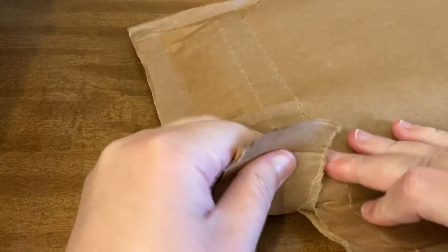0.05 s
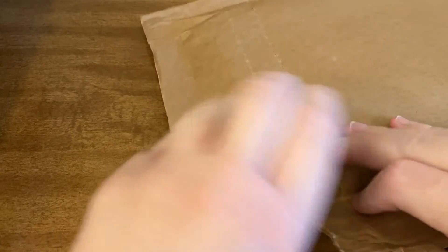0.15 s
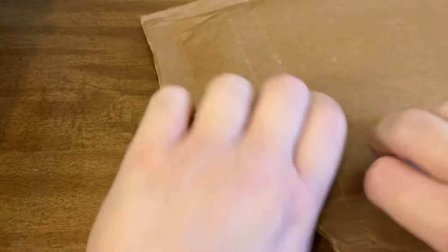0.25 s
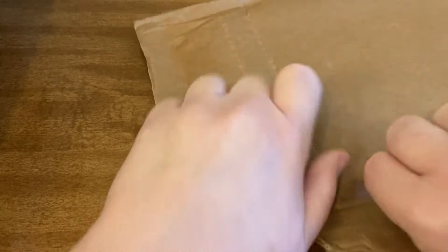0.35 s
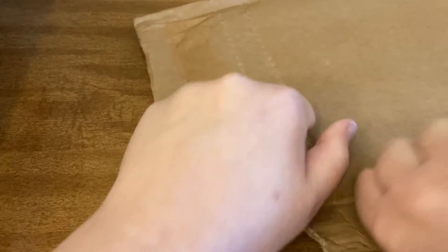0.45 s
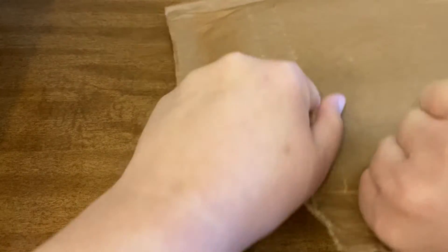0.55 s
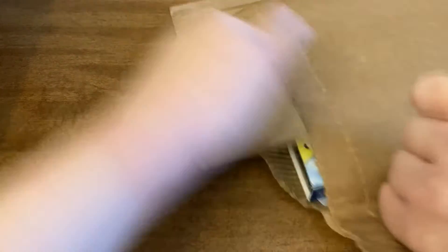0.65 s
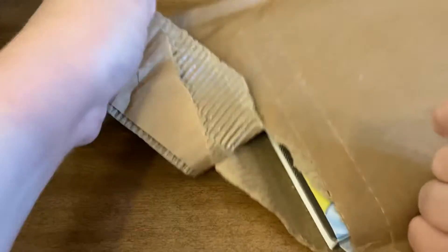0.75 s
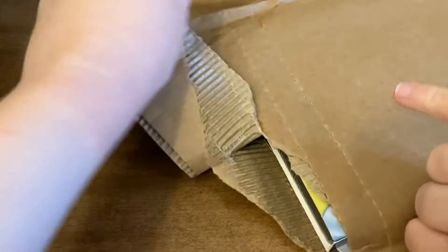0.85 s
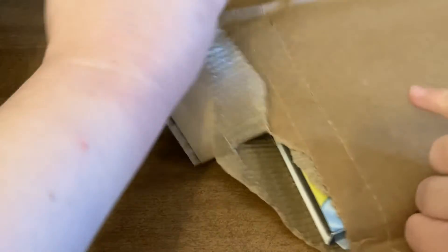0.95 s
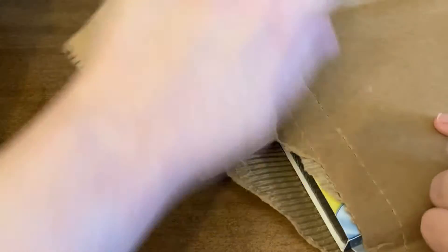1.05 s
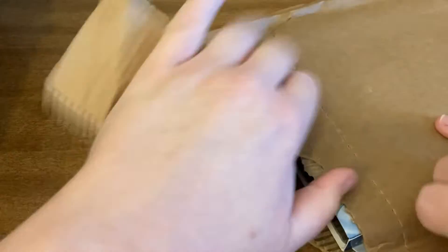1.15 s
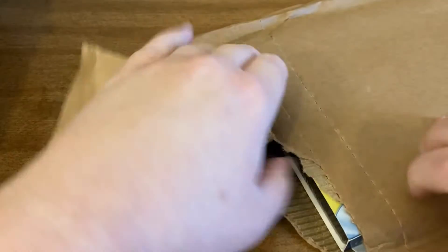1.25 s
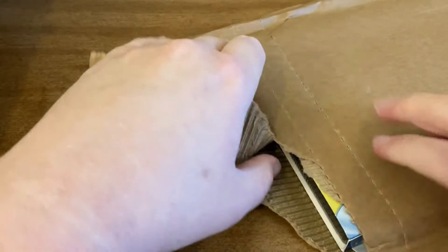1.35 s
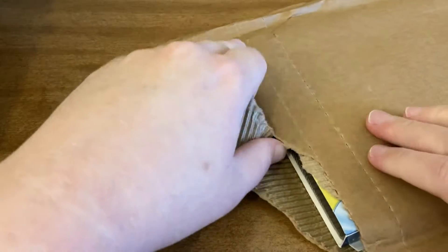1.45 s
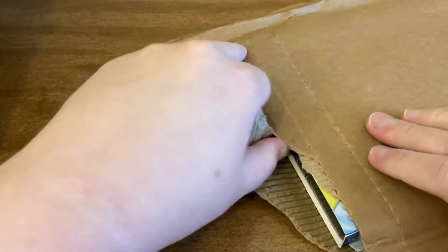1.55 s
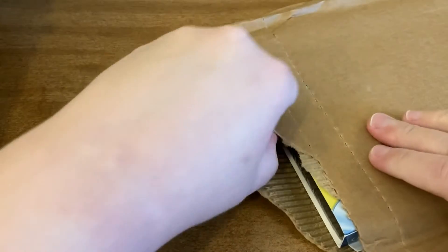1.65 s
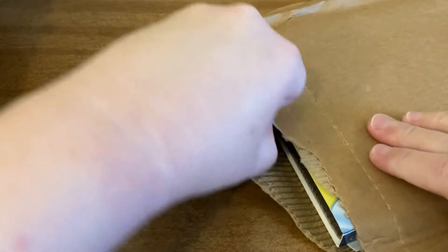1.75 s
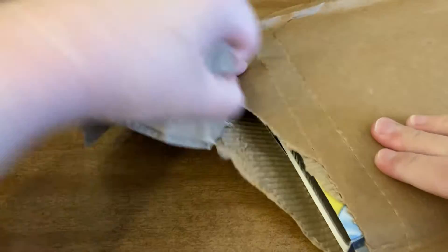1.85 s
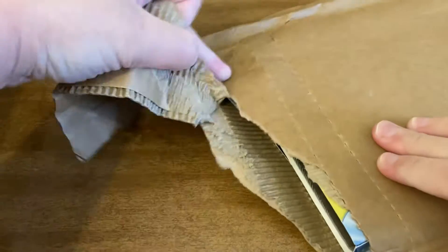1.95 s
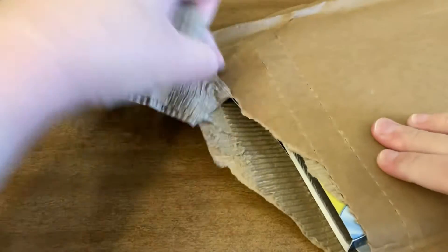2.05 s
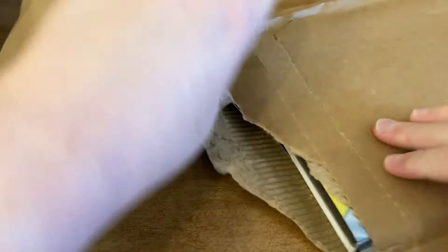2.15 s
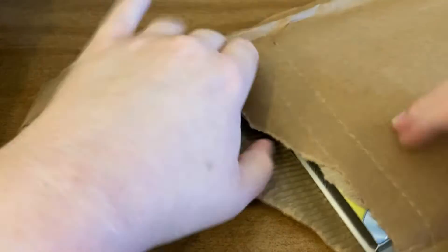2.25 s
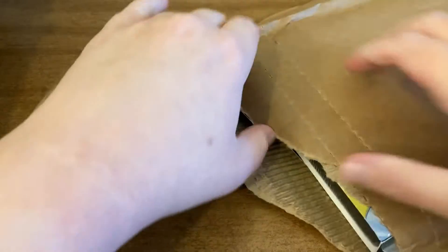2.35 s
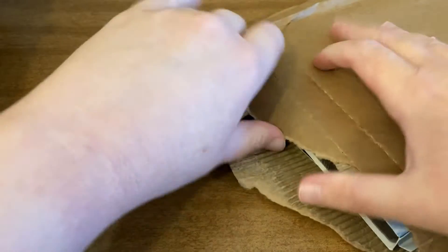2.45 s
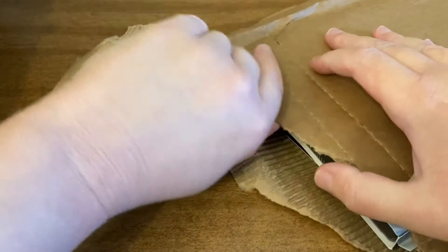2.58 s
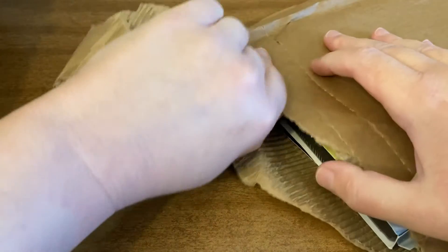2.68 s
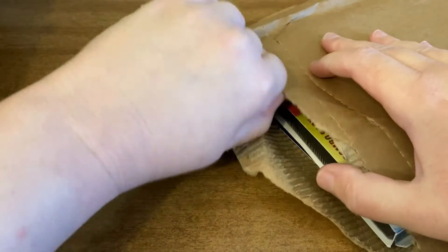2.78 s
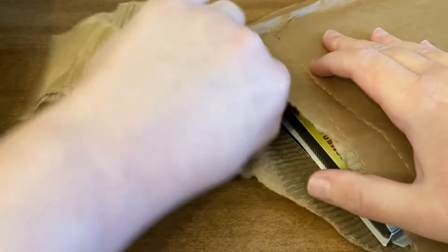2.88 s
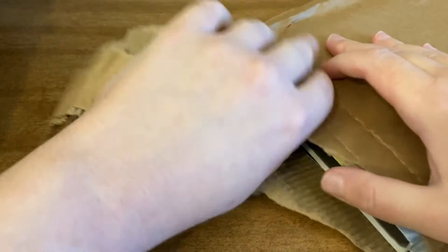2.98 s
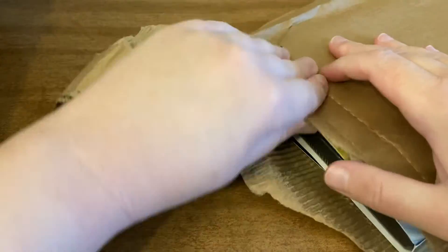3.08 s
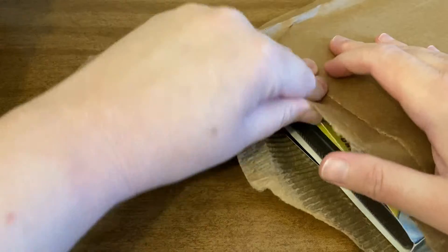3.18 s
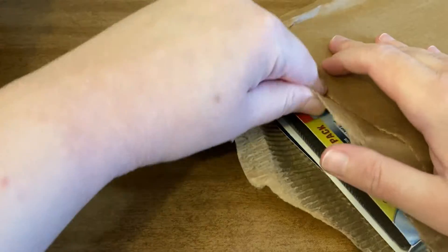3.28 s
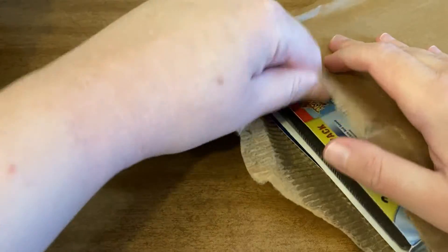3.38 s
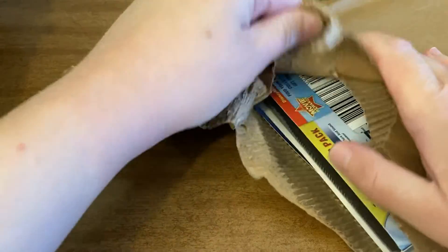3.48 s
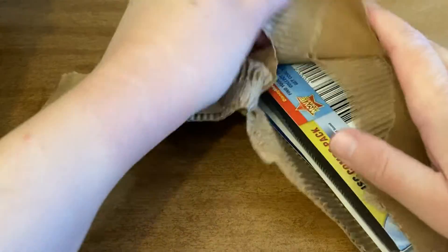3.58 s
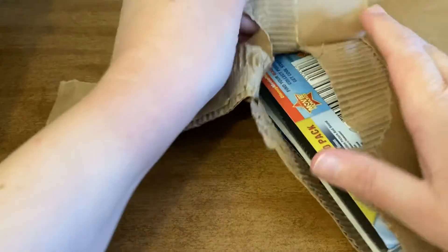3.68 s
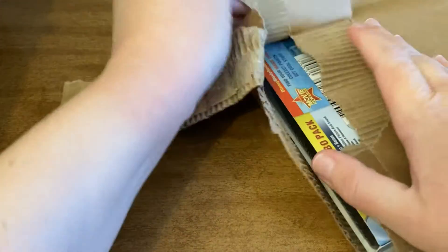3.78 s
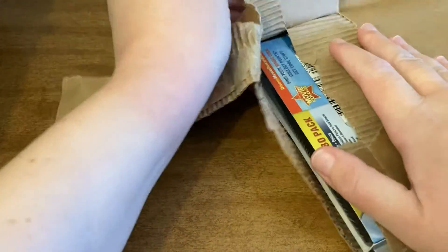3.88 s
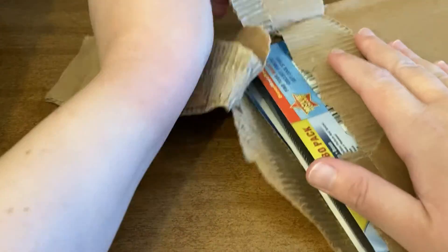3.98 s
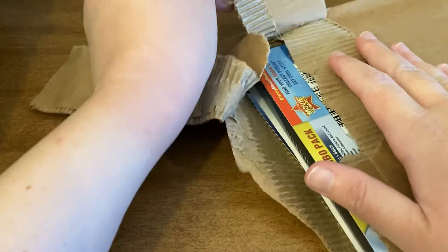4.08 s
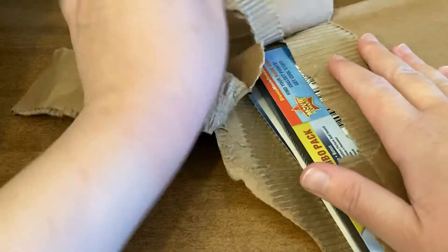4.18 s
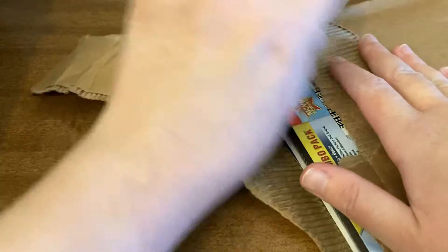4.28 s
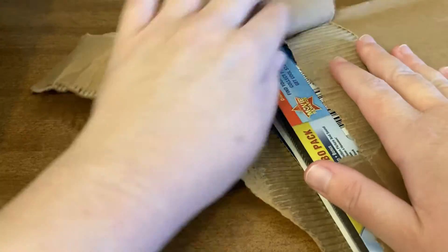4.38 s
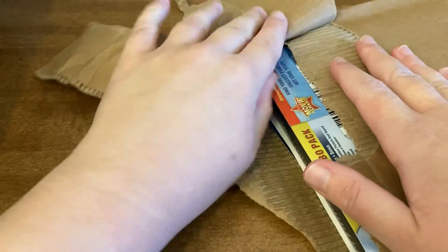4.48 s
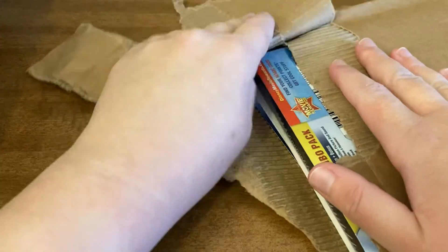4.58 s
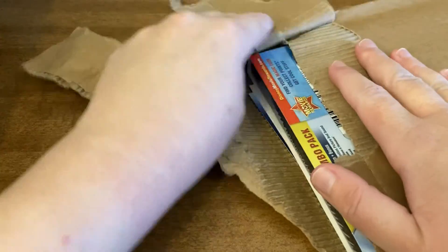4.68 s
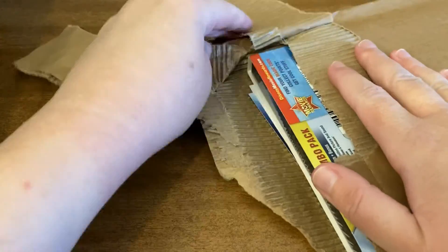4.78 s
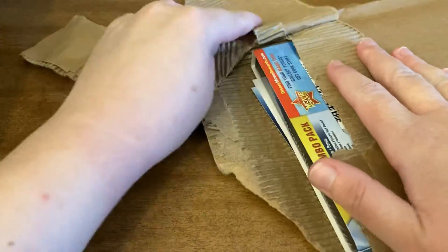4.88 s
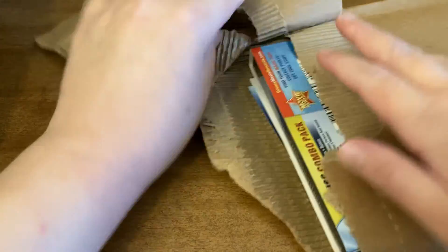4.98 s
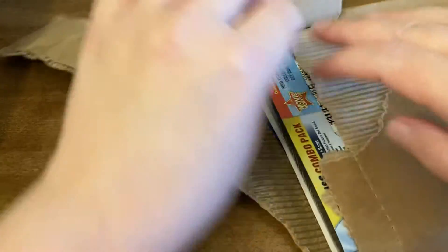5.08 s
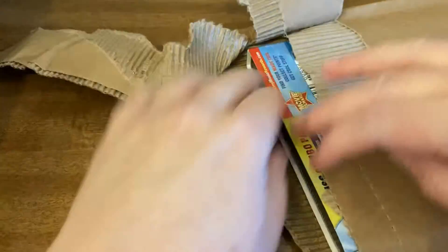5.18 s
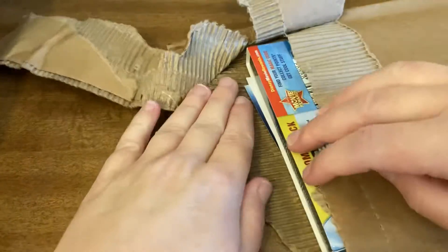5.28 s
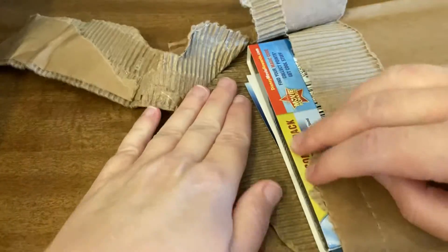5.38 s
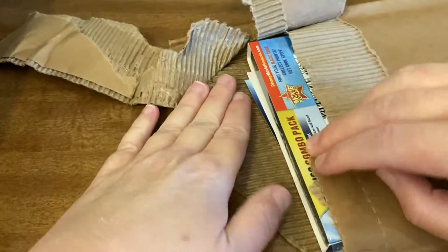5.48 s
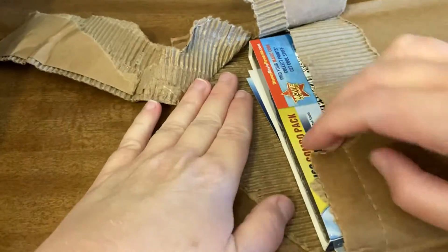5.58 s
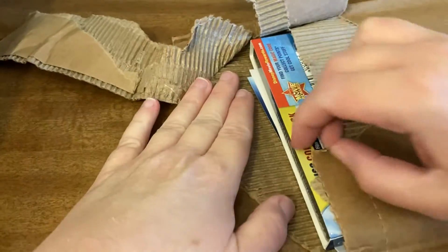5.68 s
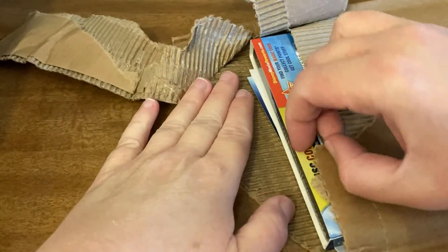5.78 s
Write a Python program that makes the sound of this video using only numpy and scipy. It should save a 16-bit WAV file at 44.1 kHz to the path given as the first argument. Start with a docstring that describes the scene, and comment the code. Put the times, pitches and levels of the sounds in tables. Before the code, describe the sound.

A cardboard mailer is pulled apart in irregular jerks. Bright, grainy fibre ticks burst into dense rips, while creases crack with short woody knocks and the panel booms softly underneath. Quiet finger handling separates the pulls. The heaviest cluster comes past the middle; the ending is sparse rustle. Close stereo microphone, wide scattered treble, centred bass, faint low room noise and a very short indoor tail.

```python
"""On a wooden table in a quiet room, hands tear a strip off a corrugated cardboard mailer.
Fibres part in dense clumps of ticks, made from random clicks through a bright filter.
Flutes and creases snap one by one: noise cracks over ringing card and a downward-sliding knock.
The card panel and the air inside the mailer boom as struck and shaken low resonances.
A close pair of microphone ports picks it up, over steady filtered-noise room tone and a short tail."""
import sys
import numpy as np
from scipy import signal
from scipy.fft import rfft, irfft
from scipy.io import wavfile

SR = 44100
rng = np.random.default_rng(int(sys.argv[2]) if len(sys.argv) > 2 else 0)


def wav_record(signal):
    """Record a signal, one row per channel, as 16-bit PCM in the file named by sys.argv[1]."""
    frames = np.transpose(np.atleast_2d(signal))
    bounded = np.clip(frames, -1, 1)
    # unit amplitude maps onto the largest positive 16-bit level
    quanta = np.round(bounded * 32767).astype(np.int16)
    wavfile.write(sys.argv[1], SR, quanta)


N = 257544


def from_db(db):
    """Decibels to amplitude; twice the decibels give power."""
    return 10 ** (np.asarray(db) / 20)


def rms_one(x):
    """Scale a signal to unit rms."""
    return x / np.sqrt(np.mean(x ** 2) + 1e-20)


def at_hz(points, hz):
    """Read a curve of (frequency, value) points along a logarithmic frequency axis."""
    point_hz, value = np.transpose(points)
    return np.interp(np.log(hz + 1), np.log(point_hz), value)


def coloured(x, spectrum):
    """Minimum-phase filter of unit energy with the given dB shape, so attacks stay sharp."""
    hz = np.linspace(0, SR / 2, 1025)
    squared_gain = from_db(2 * at_hz(spectrum, hz))   # minimum_phase takes the square root
    linear_phase = signal.firwin2(2047, hz, squared_gain, fs=SR)
    taps = signal.minimum_phase(linear_phase, n_fft=16384)
    return signal.oaconvolve(x, rms_one(taps) / np.sqrt(len(taps)))[:N]


def drift(rate_hz):
    """Random wander of unit rms: noise through two equal one-pole low-passes."""
    r = np.exp(-2 * np.pi * rate_hz / SR)
    noise = rng.standard_normal(N + 4000)
    return rms_one(signal.lfilter([1], [1, -2 * r, r * r], noise)[4000:])   # skip the run-in


def ring(clicks, hz, t60_s):
    """Two-pole resonator: a unit click starts a decaying sine of height 1."""
    r = from_db(-60 / (t60_s * SR))
    w = 2 * np.pi * hz / SR
    return signal.lfilter([0, np.sin(w)], [1, -2 * r * np.cos(w), r * r], clicks + 1e-18)


def ticks(per_s, spread_db):
    """Random clicks of either sign, their sizes spread upwards in dB."""
    draw = rng.uniform(-1, 1, N)
    size = rng.standard_exponential(N)
    out = np.zeros(N)
    born = np.abs(draw) < per_s / SR
    out[born] = np.sign(draw[born]) * from_db(spread_db * np.minimum(size[born], 5))
    return out


def shaken(modes, per_s, spread_db, clumps):
    """Each mode of a body is jolted by its own random clicks; the sum has unit rms."""
    total = 0
    for hz, db, t60_s in modes:
        jolts = clumps * ticks(per_s, spread_db)
        total = total + from_db(db) * ring(jolts, hz, t60_s)
    return rms_one(total)


def strike(modes, db, centre_hz, fall_db, rise_cycles, detune, size):
    """Modes near the centre pitch swing up most, low ones last; pitch and level vary a little at random."""
    t = np.arange(size)[:, None] / SR
    hz, mode_db, t60_s = np.transpose(modes)
    level_chance, pitch_chance = rng.standard_normal((2, len(modes)))
    near_db = -fall_db * np.log2(hz / centre_hz) ** 2
    decay = from_db(db + mode_db + near_db + 0.78 * level_chance - 60 * t / t60_s)
    rise = 1 - np.exp(-(t * hz / rise_cycles) ** 2)
    swing = np.sin(2 * np.pi * hz * (1 + detune * pitch_chance) * t)
    return np.sum(decay * rise * swing, axis=1)


# Spectrum of the quiet room: pitch_hz [Hz], density_db [dB per Hz, relative]
ROOM_TONE_SHAPE = [(18, -46), (30, 22.5), (177, -17), (315, 5), (399, -6.5), (830, -18), (2070, -31),
                   (4910, -31), (15500, -41.5)]
ROOM_TONE_DB = -56


def room_tone():
    """Steady noise with most of its weight in the bass."""
    return from_db(ROOM_TONE_DB) * rms_one(coloured(rng.standard_normal(N), ROOM_TONE_SHAPE))


# Resting fingers, a level curve: time_s [s], level_db [dB]
FINGER_TOUCH = [(0, -52), (.14, -63), (.5, -52.5), (1.2, -54), (1.6, -57), (2.6, -50), (3.2, -51.5),
                (4.4, -63.5), (4.65, -52), (5.3, -66), (5.84, -67.5)]
# Pulls and grips of the hands: full_strength_s [s], build_s [s], hold_s [s], fibre_db [dB],
# sag_db [dB lost over the hold], card_db [dB above the fibre ticks]
HAND_PULLS = [(0.188, 0.037, 0.052, -36.5, 4, -5.5), (0.318, 0.087, 0.24, -45, 7, 2.5),
              (0.624, 0.072, 0.068, -37.5, -3.5, -8.5), (0.704, 0.012, 0.034, -27, -7, -5),
              (0.749, 0.0059, 0.1, -13.5, 5.5, -3), (1.003, 0.063, 0.014, -39, 3, -24),
              (1.079, 0.1, 0.025, -34, 0, -8), (1.247, 0.1, 0.13, -42, -4, -2.5),
              (1.405, 0.053, 0.035, -38.5, -5.5, -6), (1.523, 0.0089, 0.027, -52, -1.5, 3.5),
              (1.631, 0.0037, 0.059, -37.5, 6, -7), (1.755, .02, 0.034, -39.5, -6, -13.5),
              (1.927, 0.12, 0.076, -13.5, 16, -8.5), (1.998, 0.046, 0.06, -13, 10.5, -14),
              (2.157, 0.063, 0.071, -37, -2, -5), (2.352, 0.14, 0.012, -36.5, -7, -2.5),
              (2.433, 0.025, 0.022, -25.5, 4, -6.5), (2.778, 0.015, 0.18, -44, 0, 1.5),
              (3.019, 0.037, 0.053, -37.5, -1, -4), (3.237, 0.11, 0.16, -47.5, -5, -3),
              (3.345, 0.0061, 0.0064, -26.5, 11.5, 2.5), (3.425, 0.033, 0.028, -24.5, 6.5, -6.5),
              (3.486, 0.006, 0.017, -30.5, -7, -7.5), (3.515, 0.0061, 0.17, -11.5, 18.5, -5),
              (3.667, 0.068, 0.15, -18, 5, -8), (3.87, 0.01, 0.014, -17, -3, -9.5),
              (3.887, .01, 0.056, -30, -9.5, -4), (4.039, 0.054, 0.029, -22, -3, 0),
              (4.253, 0.067, 0.12, -45.5, 7, -4.5), (4.449, 0.012, 0.018, -50, 9.5, 1),
              (4.688, 0.025, 0.084, -40.5, -3, -3.5), (4.813, 0.02, 0.015, -28, 2, -8),
              (4.832, 0.056, 0.025, -16, 3, -7), (4.874, 0.0082, 0.025, -31, 1, -10.5),
              (4.983, 0.082, 0.016, -40.5, 21.5, 5.5), (5.047, 0.17, 0.085, -43.5, -1, -1.5),
              (5.327, 0.021, 0.2, -50.5, 5.5, -2), (5.48, 0.0079, 0.068, -46.5, 5, -2),
              (5.62, 0.24, 0.098, -51.5, 5.5, -2)]
BUILD_DB, RELEASE_DB_PER_S = 27, 803   # rise over the build-up; fall once the hand lets go
SETTLE_DB, SETTLE_DB_PER_S = -20, 89.5   # the flap goes on settling, far below the pull
CARD_SAG_DB_PER_S = 26   # during the hold the card calms sooner than the fibres
PANEL_FOLLOWS, PANEL_DB = 0.74, -16.5   # share of the card's swing in dB; level at card gain 1
PANEL_LAG_S = 0.015   # the heavy panel takes up a pull late


def effort():
    """Each pull builds up, holds while it sags, lets go and settles; gains of fibres, card and panel."""
    t = np.arange(N) / SR
    fibre_power = card_power = from_db(2 * np.interp(t, *np.transpose(FINGER_TOUCH)))
    for full_s, build_s, hold_s, fibre_db, sag_db, card_db in HAND_PULLS:
        before_s = np.maximum(full_s - t, 0)
        held_s = np.clip(t - full_s, 0, hold_s)
        after_s = np.maximum(t - full_s - hold_s, 0)
        level_db = fibre_db - BUILD_DB * before_s / build_s - sag_db * held_s / hold_s
        release = from_db(-2 * RELEASE_DB_PER_S * after_s)
        settling = from_db(2 * (SETTLE_DB - SETTLE_DB_PER_S * after_s))
        pull_power = from_db(2 * level_db) * (release + settling)
        fibre_power = fibre_power + pull_power
        card_power = card_power + pull_power * from_db(2 * (card_db - CARD_SAG_DB_PER_S * held_s))
    late_power = np.interp(t - PANEL_LAG_S, t, card_power)
    panel = from_db(PANEL_DB) * late_power ** (PANEL_FOLLOWS / 2)
    return np.sqrt(fibre_power), np.sqrt(card_power), panel


# Brightness of parting fibres, also of cracks: pitch_hz [Hz], density_db [dB per Hz, relative]
FIBRE_SHAPE = [(1500, -20), (3000, -6), (4500, -4), (6000, -4.5), (7500, -2.5), (8800, 0), (11000, -2),
               (13500, -5), (15700, -7)]
# Resonances of the card: pitch_hz [Hz], level_db [dB, relative drive], t60_s [s]
CARD_MODES = [(500, -8.5, 0.014), (651, -0.5, 0.021), (869, -0.5, 0.018), (1002, 2.5, 0.014),
              (1212, 0, 0.015), (1551, 8.5, 0.009), (1990, 2, 0.013), (2300, 15.5, 0.0038),
              (3070, 10, 0.0061), (4050, 14.5, 0.0026)]
# Resonances of the panel and the air in the mailer: pitch_hz [Hz], level_db [dB, relative drive], t60_s [s]
PANEL_MODES = [(108.8, -2.5, 0.11), (170, -22, 0.16), (232.4, 5, 0.036), (288.4, 0.5, 0.046),
               (434, -12.5, 0.069)]
# glue lines of the flutes burst: rate, decay time constant, swell
FLUTES_PER_S, FLUTE_DECAY_S, FLUTE_LIFT = 200, 0.002, 1.3


def tearing():
    """Fibres let go in clumps, flute by flute; the same clumps shake card and panel."""
    fibre, card, panel = effort()
    clump = 0.75 * drift(160) + 0.25 * drift(40)
    flute_fade = np.exp(-1 / (FLUTE_DECAY_S * SR))
    bursts = np.abs(ticks(FLUTES_PER_S, spread_db=0.0))
    flutes = 1.5 + FLUTE_LIFT * signal.lfilter([1], [1, -flute_fade], bursts)

    # a hard pull breaks fibres in a dense run, light handling in lone ticks
    per_s = 30000 * fibre ** 0.4
    even_ticks = ticks(per_s, spread_db=1.5) / np.sqrt(per_s)   # density leaves the mean power alone
    clumped_ticks = flutes * from_db(1.7 * clump) * even_ticks
    fibre_ticks = fibre * rms_one(coloured(clumped_ticks, FIBRE_SHAPE))

    card_rustle = card * shaken(CARD_MODES, 2500, 0.28, flutes * from_db(2.0 * clump))
    panel_rumble = panel * shaken(PANEL_MODES, 330, 4.7, from_db(0.34 * clump))
    return fibre_ticks + card_rustle + panel_rumble


# Creases and flutes that snap: start_s [s], crack_db [dB, before colouring],
# card_db [dB, card drive above the crack], patch_hz [Hz]
CREASE_SNAPS = [(0.0196, -24, -31, 2720), (0.306, -45, 8, 1800), (0.3154, -37, 11.5, 1310),
                (0.451, -8.5, -11.5, 1120), (0.7056, -13.5, -11, 3020), (0.7465, -1, -5, 920),
                (1.034, -35, 10.5, 865), (1.2491, -38.5, 8.5, 1340), (1.335, -37, 6, 1000),
                (1.531, -21.5, -11, 1290), (1.6205, -20, -11, 1490), (1.6529, -17.5, -10, 1280),
                (1.7563, -33, -26, 1350), (1.844, -17, -9, 2000), (1.891, -12, -18, 1450),
                (1.994, -8, -21, 3020), (2.1607, -33.5, 2, 990), (2.313, -24, -7, 1500),
                (2.352, -16, 6.5, 623), (2.461, -20.5, 1.5, 2570), (2.7274, -5.5, 1, 1630),
                (2.7278, -17.5, 10.5, 580), (2.776, -39.5, -15, 1910), (2.852, -9.5, -1, 1040),
                (2.8995, -18, -8.5, 1830), (3.055, -22, -3.5, 2780), (3.1371, -22, 4.5, 730),
                (3.2992, -26, -2, 940), (3.331, -16.5, -13, 1210), (3.3363, -5, -1, 610),
                (3.344, -6.5, -18, 1560), (3.375, -12.5, -16.5, 1930), (3.4161, -1.5, -16.5, 1630),
                (3.508, 1, -22, 1330), (3.518, -7.5, -0.5, 1320), (3.659, -5, -35, 2280),
                (3.878, -6, -5.5, 2180), (3.8923, -4.5, -3, 1016), (3.905, -10, 1.5, 1230),
                (3.937, -2, -13, 1130), (3.95, -14, -4, 2600), (4.0116, -10, -14, 970),
                (4.045, -17, -6, 800), (4.0536, -9, -3.5, 1200), (4.063, -17, -7, 910),
                (4.0757, -7.5, -1, 810), (4.3002, -39.5, 14, 960), (4.441, -35.5, 6.5, 590),
                (4.644, -34.5, 9, 1540), (4.6908, -6.5, -6, 3310), (4.7986, -17.5, -4, 1690),
                (5.0602, -17.5, -10, 1660), (5.432, -30, -30, 3060), (5.481, -25.5, -27, 2040)]
CRACK_CUT_HZ = 8600   # a crack is duller than the fibre ticks
LEAD_DB, LEAD_DB_PER_S = -28, 2501.5   # fibres start to give just before a snap
GIVE_S = 0.00302   # a crease gives way in two steps within this time; also the knock's rise
SLIDE_S, KNOCK_T60_S = 0.002927, 0.041   # time constant of the pitch slide; decay of the knock
# knock against the card drive for a 700 Hz patch; pitch it lands on; loss per octave of patch pitch
SNAP_BOOM_DB, SNAP_BOOM_HZ, BOOM_LOSS_DB = -6.5, 245, 3


def snaps():
    """A short noise crack with ringing card modes; a knock slides from patch pitch to panel boom."""
    crack, body = np.zeros((2, N + 6000))
    t = np.arange(6000) / SR
    for start_s, crack_db, card_db, patch_hz in CREASE_SNAPS:
        i = round(start_s * SR)
        drive_db = crack_db + card_db

        burst = rng.standard_normal(len(t)) * from_db(crack_db - 60 * t / 0.012)
        crack[i:i + len(t)] += burst * (1 - np.exp(-t / 0.00038))
        lead_s = t[:min(i, 600)][::-1]   # time left until the snap
        lead_gain = from_db(crack_db + LEAD_DB - LEAD_DB_PER_S * lead_s)
        crack[i - len(lead_s):i] += rng.standard_normal(len(lead_s)) * lead_gain

        for late_s in (0, rng.random() * GIVE_S):
            j = i + int(late_s * SR)
            step = strike(CARD_MODES, drive_db - 5, patch_hz,
                          fall_db=9.0, rise_cycles=0.66, detune=0.06, size=2000)
            body[j:j + len(step)] += step

        boom_db = drive_db + SNAP_BOOM_DB - BOOM_LOSS_DB * np.log2(patch_hz / 700)
        slide_hz = SNAP_BOOM_HZ + (patch_hz - SNAP_BOOM_HZ) * np.exp(-t / SLIDE_S)
        knock = np.sin(2 * np.pi * np.cumsum(slide_hz) / SR)
        knock_gain = from_db(boom_db - 60 * t / KNOCK_T60_S) * (1 - np.exp(-t / GIVE_S))
        body[i:i + len(t)] += knock_gain * knock
    dull = signal.butter(1, CRACK_CUT_HZ, fs=SR, output="sos")
    return signal.sosfilt(dull, coloured(crack[:N], FIBRE_SHAPE)) + body[:N]


# Low booms of the panel, some together with a crease snap:
# start_s [s], drive_db [dB, before mode levels], pitch_hz [Hz, favoured]
PANEL_BOOMS = [(0.36, -17.5, 208), (0.451, -28, 250), (0.7694, 0, 260), (1.036, -23, 256),
               (1.113, -20.5, 93.5), (1.287, -18, 107), (1.328, -18.5, 204), (1.54, -20, 93.5),
               (2.01, -16, 93), (2.313, -8.5, 117), (2.337, -7.5, 109), (2.363, -7.5, 227),
               (2.575, -22, 110), (2.727, -17.5, 240), (2.851, -12, 264), (3.009, -24.5, 242),
               (3.141, -20, 247), (3.259, -22, 240), (3.335, -10.5, 148), (3.511, -20, 110),
               (4.513, -32, 249), (4.585, -29.5, 246), (4.691, -13.5, 211), (4.837, -18, 110),
               (5.334, -22, 117)]


def panel_booms():
    """Low booms: the panel modes nearest a favoured pitch swing up and die away."""
    out = np.zeros(N + 6000)
    for start_s, drive_db, pitch_hz in PANEL_BOOMS:
        i = round(start_s * SR)
        out[i:i + 6000] += strike(PANEL_MODES, drive_db, pitch_hz,
                                  fall_db=5.5, rise_cycles=1.73, detune=0.073, size=6000)
    return out[:N]


# Power share that both ports hear alike: pitch_hz [Hz], likeness [0 to 1]
PORT_LIKENESS = [(200, 1), (600, 0.5), (1200, 0.75), (2200, 0.24), (4200, 0.039), (6000, 0.23),
                 (7000, 0.88), (15000, 0.81)]
# Tilt between the ports: pitch_hz [Hz], left_above_right_db [dB]
PORT_TILT = [(200, 0.2), (2500, 1.6), (7000, 0.0)]
PORT_LAG_S, PORT_FLIP_HZ = 2.21e-4, 3500   # lag of the left treble; where lag and inversion set in


def ports(x):
    """Bass reaches both ports alike; treble reaches the left one later and upside down.

    The unlike share is scattered off the moving hands within a few ms, anew in every short block."""
    hop, size = 512, 2048
    count = N // hop + 2
    padded = np.pad(x, (hop, 3 * hop))
    blocks = np.array([padded[k * hop:(k + 2) * hop] for k in range(count)])
    blocks = blocks * signal.get_window("hann", 2 * hop)
    hz = np.arange(size // 2 + 1) * SR / size

    scatter = rng.standard_normal((2, count, hop)) * from_db(-60 * np.arange(hop) / SR / 0.014)
    scattered = rfft(scatter / np.linalg.norm(scatter, axis=2, keepdims=True), size)
    flip = 1 / (1 + (PORT_FLIP_HZ / (hz + 1)) ** 6)
    turn = np.exp(1j * flip * (np.pi - 2 * np.pi * hz * PORT_LAG_S))
    direct = np.array([turn, np.ones_like(turn)])[:, None]
    alike = np.clip(at_hz(PORT_LIKENESS, hz), 0, 1)
    heard = np.sqrt(alike) * direct + np.sqrt(1 - alike) * scattered

    sides = np.array([[[1]], [[-1]]])
    lean = from_db(at_hz(PORT_TILT, hz) / 2 * sides)
    start = np.exp(-2j * np.pi * hz * hop / 2 / SR)   # room for the turn to reach back
    pieces = irfft(rfft(blocks, size) * lean * heard * start, size)
    out = np.zeros((2, count * hop + size))
    for k in range(count):
        out[:, k * hop:k * hop + size] += pieces[:, k]
    return out[:, hop + hop // 2:][:, :N]


ROOM_T60_S, ROOM_DB, WALL_CUT_HZ = 0.14, -13.5, 6800


def room(x):
    """A dull decaying noise tail after a 4 ms gap, its own on each side."""
    t = np.arange(round(ROOM_T60_S * SR)) / SR
    tail = rng.standard_normal((2, len(t))) * from_db(-60 * t / ROOM_T60_S) * (t > 0.004)
    tail = signal.sosfilt(signal.butter(1, WALL_CUT_HZ, fs=SR, output="sos"), tail)
    unit_tail = rms_one(tail) / np.sqrt(len(t))
    return from_db(ROOM_DB) * signal.oaconvolve(x[None], unit_tail, axes=1)[:, :N]


def scene():
    """The mailer and the room tone at the ports, plus the mailer's room tail."""
    tone = room_tone()
    mailer = tearing() + snaps() + panel_booms()
    return ports(mailer + tone) + room(mailer)


CUTOFF_HZ = 15750


def record(dry):
    """The deepest bass is cut, full scale clips, the top is cut steeply."""
    low_cut = signal.butter(2, 55, "high", fs=SR, output="sos")
    clipped = np.clip(signal.sosfilt(low_cut, dry), -1, 1)
    top_cut = signal.ellip(12, 0.3, 80, CUTOFF_HZ, fs=SR, output="sos")
    return signal.sosfilt(top_cut, clipped)


dry = scene()
out = record(dry)
wav_record(out)
```